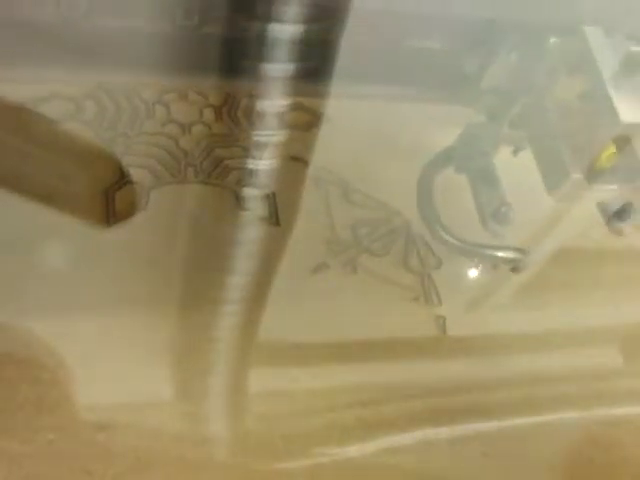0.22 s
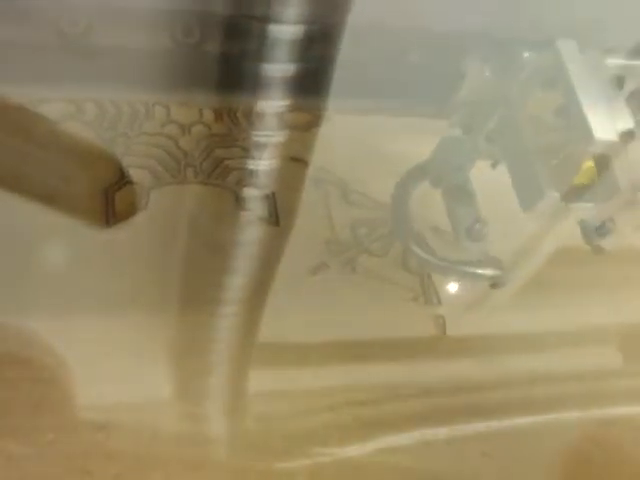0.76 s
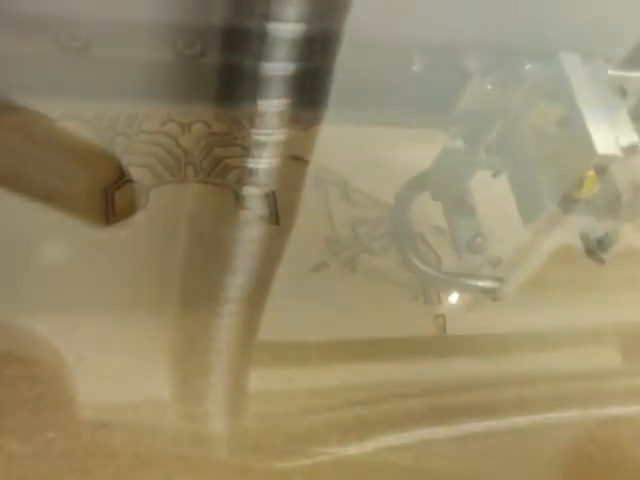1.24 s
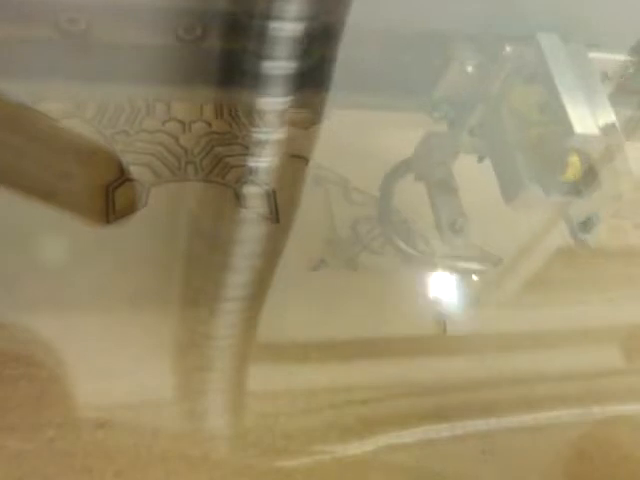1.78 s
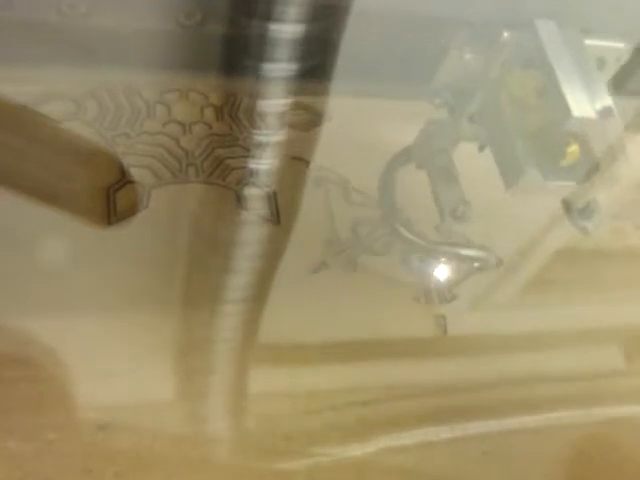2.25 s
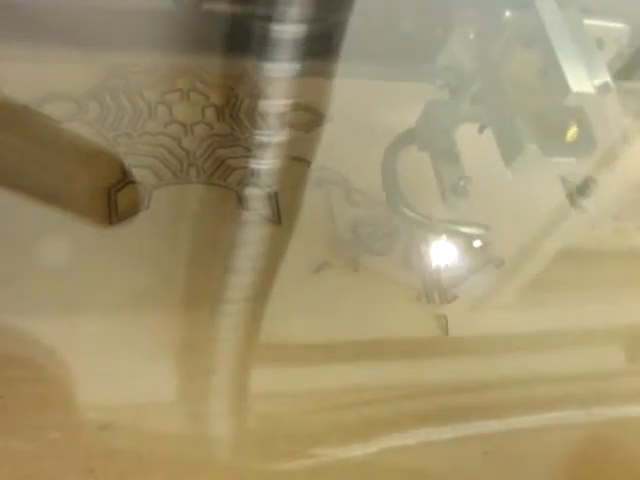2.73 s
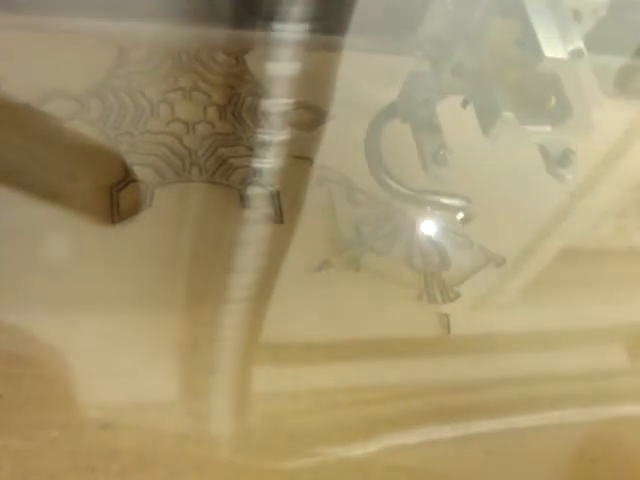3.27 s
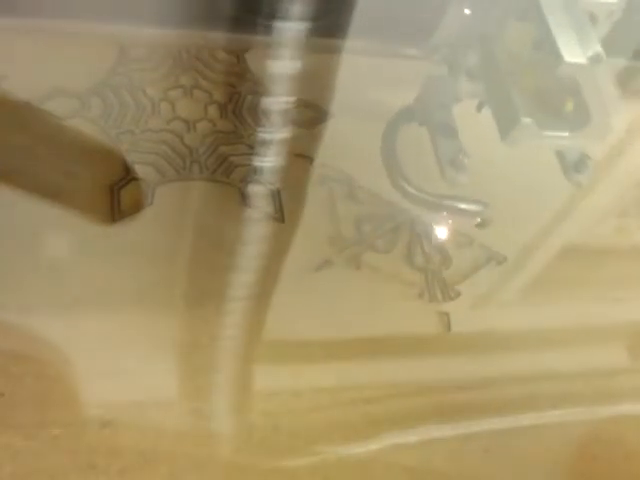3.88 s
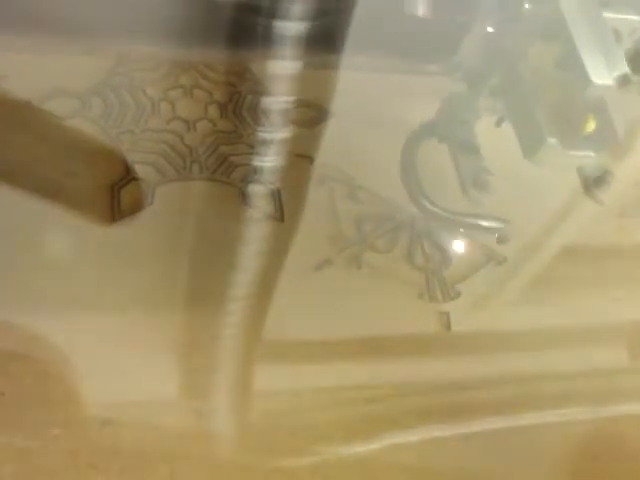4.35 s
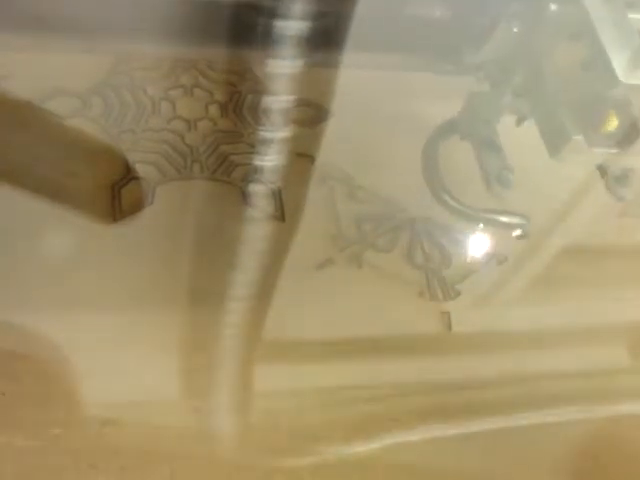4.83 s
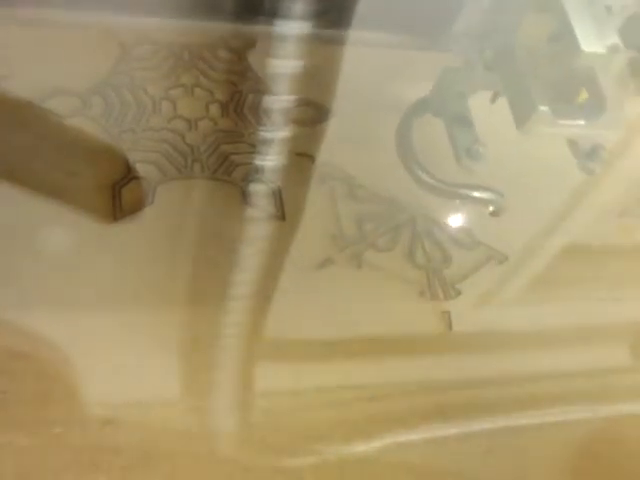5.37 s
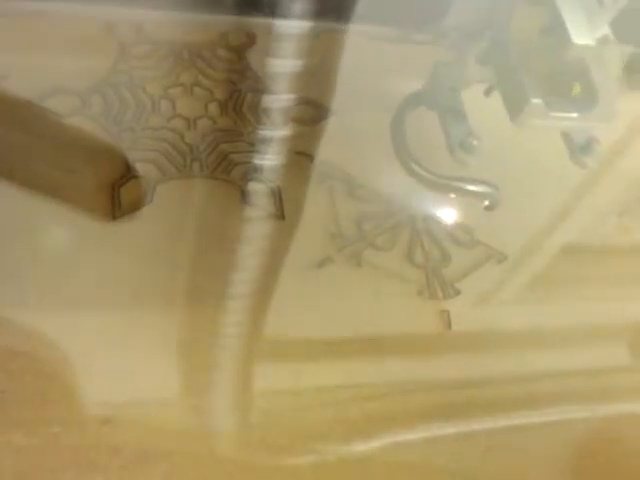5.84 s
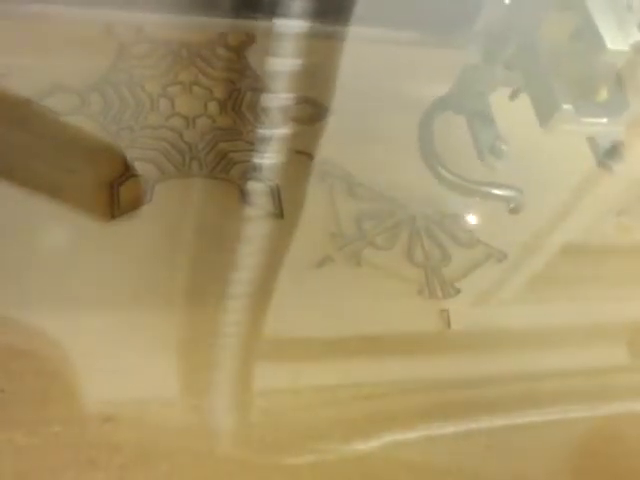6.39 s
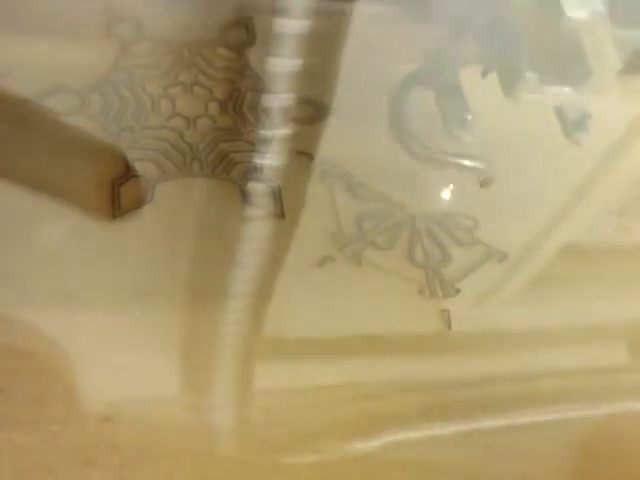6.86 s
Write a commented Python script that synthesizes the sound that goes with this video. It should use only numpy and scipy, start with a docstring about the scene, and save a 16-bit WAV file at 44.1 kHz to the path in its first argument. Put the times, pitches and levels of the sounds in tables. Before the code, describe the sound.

A laser cutter runs indoors for about seven seconds, heard from one microphone close by the lid. The main sound is a nearly even rush of exhaust air, with little top treble, present from start to end. Inside it a low duct drone flutters, dipping slightly around 1.7 and 5.2 seconds and swelling near 2.8. The motors steering the cutting head sing short, soft notes at changing low and middle pitches, some just blips, others held for up to a second, gliding a little and sometimes overlapping. The clearest note comes from about 1.7 to 2.2 seconds, and the motors pause briefly between 3 and 3.5 before carrying on. Behind them two fans whine steadily, over a faint, slightly wavering hum of pumps and panels. A single faint, dry tick sounds at about 1.8 seconds. The machine is still running at the end.

```python
"""Indoors, one microphone close by the lid of a working laser cutter.
Exhaust air rushes through the cabinet and its duct. Stepper motors sing short, soft notes as
they steer the head along the pattern. Behind them two fans whine on their blade tones over
a faint hum of pumps and panels. A single dry tick sounds early on."""
import sys
import numpy as np
from scipy.fft import rfft, irfft, next_fast_len
from scipy.io import wavfile
from scipy.ndimage import uniform_filter1d, map_coordinates

SR = 44100
rng = np.random.default_rng(int(sys.argv[2]) if len(sys.argv) > 2 else 0)


def digitize_waveform(pressure):
    """Quantize a signal to 16-bit integers and store it at the path in sys.argv[1].

    Rows of a 2-D input are taken as channels; values are limited to [-1, 1].
    """
    field = np.atleast_2d(pressure).T
    bounded = np.clip(field, -1, 1)
    quanta = np.round(bounded * 32767).astype(np.int16)
    wavfile.write(sys.argv[1], SR, quanta)


N = 313727

# Spectrum of the turbulent exhaust air. Each row: frequency in Hz, relative level in dB.
AIR_SPECTRUM = [(12, -45), (35, -29.5), (70, -22.5), (115, -10.5), (175, -12.5), (260, -2), (480, -4.5),
                (900, -2), (1500, -1.5), (2600, -1.7), (4150, -3), (4650, -13), (5400, -23.5), (7200, -37)]
# Resonances and nulls of cabinet, duct and nozzle. Each row: centre in Hz, width in Hz, lift in dB.
CAVITY_RESONANCES = [(47, 12, 9.5), (176, 14, -2), (200, 11, 4), (244, 11, -6.5), (362, 8, -3),
                     (505, 25, -2), (660, 100, 4.5), (715, 12, -3), (762, 52, 7.5), (817, 44, 8),
                     (878, 26, 5), (934, 34, 5), (1036, 40, 2.8), (1265, 90, 2.3), (1365, 40, 1.2),
                     (1750, 45, 2), (1865, 45, 2.5), (2927, 190, 2.5), (3115, 85, 4.3), (3200, 80, 5.3),
                     (3308, 30, 4), (3358, 55, 3.2), (3445, 55, 2), (4900, 190, 2.5), (6070, 240, -6.5),
                     (6630, 780, 6), (6960, 100, -3.5), (7120, 130, 3)]
# Chance rises and dips in the loudness of a low, fluttering noise band near 300 Hz.
# Each row: time in seconds, rms level in dB.
LOW_BAND_LEVELS = [(0, -33), (1.4, -34.5), (1.7, -39), (2.45, -35), (2.75, -30.5), (3.2, -34.5),
                   (4.85, -32.5), (5.22, -38.5), (5.702, -33), (7.11, -33.5)]
# Moves of the cutting head. Each row: start in seconds, length in seconds,
# first and last step rate in Hz, rms level of the held note in dB.
HEAD_MOVES = [ (.03, 1.1, 686, 692, -34), (.12, 0.11, 755, 788, -33), (.2, 0.62, 343, 337, -43),
              (.86, .9, 637.5, 644, -36.5), (1.28, 0.083, 483, 465, -33), (1.33, 0.12, 800, 788, -36.5),
              (1.42, 0.56, 139.3, 140.2, -49.5), (1.6, 0.16, 219, 201, -39), (1.716, 0.48, 680, 684, -28.5),
              (2.1, 0.31, 676, 663, -35.5), (2.27, 0.29, 134.3, 143, -48.5), (2.53, 0.069, 483, 470, -36),
              (2.683, 0.32, 630.5, 641, -33.5), (3.5, 0.28, 755, 733, -49), (3.77, 0.15, 530, 531, -36),
              (3.88, .9, 531.6, 535, -35.5), (4.67, .17, 137.7, 129, -45.5), (4.96, 0.13, 528, 526, -37.5),
              (5.249, 0.22, 391, 380, -37), (5.519, .16, 369, 376, -36), (5.94, 0.22, 778, 764, -36),
              (6.05, 0.73, 196, 197, -48.5), (6.53, 0.1, 463, 480, -39), (6.75, .16, 590, 450, -36),
              (6.99, 0.14, 756, 780, -35), ]
# Blade tones of the two fans. Each row: multiple of the blade rate, rms level in dB.
BLOWER_TONES = [(1, -37.2), (2, -44.5), (3, -52), (4, -44.5), (5, -37.7)]
COOLING_FAN_TONES = [(1, -42), (2, -41.8), (3, -44), (4, -46.5)]
# Hum and whine of the pumps and panels. Each row: frequency in Hz, rms level in dB.
HUM_TONES = [(89, -64.5), (137, -59), (551, -38), (580, -47.5), (1089, -47.5), (1161, -42.5), (1633, -42),
             (2114, -47.5), (2206, -50), (3125, -46.5)]

RISE_SHARE, FADE_SHARE = 0.16, 0.36  # parts of a move over which its note rises and fades
SKIRT_HZ, SKIRT_DB = 16, -11  # width and relative level of the noise around each fan and hum tone
MIC_TOP_HZ, TICK_TOP_HZ = 7260, 15700


def amp(db):
    """Decibels to gain."""
    return 10 ** (np.asarray(db) / 20)


def unit_rms(x):
    """x at rms 1."""
    return x / np.sqrt(np.mean(x ** 2) + 1e-20)


def wobble(rate):
    """A smooth random curve, rate knots a second."""
    knots = rng.standard_normal(int(N * rate / SR) + 4)
    return map_coordinates(knots, [np.arange(N) * rate / SR])


def filtered(x, response):
    """x through a filter whose gain is response(hz)."""
    size = next_fast_len(N + SR // 2)
    hz = np.fft.rfftfreq(size, 1 / SR)
    return irfft(rfft(x, size) * response(hz), size)[..., :N]


def shaken_tone(hz):
    """A sine of rms 1 that follows a frequency curve; turbulence shakes its level and phase."""
    shake = amp(SKIRT_DB) * (wobble(SKIRT_HZ) + 1j * wobble(SKIRT_HZ)) / np.sqrt(2)
    carrier = np.exp(2j * np.pi * (np.cumsum(hz) / SR + rng.random()))
    return unit_rms(np.real((1 + shake) * carrier))


def exhaust_rush(level_db, surge_db):
    """Up front, a nearly even flow of turbulent air, coloured by the cavities it passes."""
    def colour(hz):
        air_hz, air_db = np.transpose(AIR_SPECTRUM)
        turbulence_db = np.interp(np.log(hz + 1), np.log(air_hz + 1), air_db)
        cavity_db = sum(db * 2 ** -((2 * (hz - centre) / width) ** 2)
                        for centre, width, db in CAVITY_RESONANCES)
        return amp(turbulence_db + cavity_db)

    rush = unit_rms(filtered(rng.standard_normal(N), colour))
    return amp(level_db + surge_db * wobble(3.3)) * rush


def duct_drone(centre_hz, width_hz):
    """The flow drives the duct's resonance: a low, fluttering noise band with chance rises and dips."""
    ring = filtered(rng.standard_normal(N), lambda hz: 1 / (1 + (2 * (hz - centre_hz) / width_hz) ** 2))
    running_rms = np.sqrt(np.abs(uniform_filter1d(ring ** 2, size=SR // 4)))
    even_ring = ring / running_rms  # only the quick flutter stays
    level_db = np.interp(np.arange(N) / SR, *np.transpose(LOW_BAND_LEVELS))
    return amp(level_db) * even_ring


def stepper_notes(flutter_db, jitter_hz):
    """Under the lid the motors sing at their step rate, which glides where the path curves."""
    t = np.arange(N) / SR
    notes = np.zeros(N)
    judder_hz = jitter_hz * wobble(35)  # the rotors shake against the belt
    for start, length, first_hz, last_hz, db in HEAD_MOVES:
        moving = (t >= start) & (t < start + length)
        progress = (t[moving] - start) / length
        envelope = np.clip(np.minimum(progress / RISE_SHARE, (1 - progress) / FADE_SHARE), 0, 1)
        step_hz = first_hz + (last_hz - first_hz) * progress + judder_hz[moving]
        phase = 2 * np.pi * np.cumsum(step_hz) / SR
        notes[moving] += amp(db) * envelope * np.sqrt(2) * np.sin(phase)
    return notes * amp(flutter_db * wobble(30))  # the belt loads the motor unevenly


def fan_whine(tones, blade_hz, drift_share, flutter_db):
    """Blade tones share one drifting speed; uneven inflow makes each flutter on its own."""
    drifting_hz = blade_hz * (1 + drift_share * wobble(3))
    return sum(amp(db + flutter_db * wobble(14)) * shaken_tone(multiple * drifting_hz)
               for multiple, db in tones)


def pump_hum(waver_hz, flutter_db):
    """In the background, pumps and panels hold steady tones that waver slightly."""
    return sum(amp(db + flutter_db * wobble(5.9)) * shaken_tone(hz + waver_hz * wobble(6))
               for hz, db in HUM_TONES)


def dry_tick(at_s, impulse_db):
    """One faint tick, a low-passed impulse brighter than everything else."""
    impulse = np.zeros(N)
    impulse[round(at_s * SR)] = amp(impulse_db)
    return filtered(impulse, lambda hz: 1 / (1 + (hz / TICK_TOP_HZ) ** 120))


def scene():
    """Air, duct, head motors, fans and hum from close by the lid, in mono."""
    rush = exhaust_rush(level_db=-22.0, surge_db=0.13)
    drone = duct_drone(centre_hz=304.0, width_hz=41.3)
    motors = stepper_notes(flutter_db=1.6, jitter_hz=3.3)
    blower = fan_whine(BLOWER_TONES, blade_hz=619.2, drift_share=0.0007, flutter_db=0.5)
    cooling_fan = fan_whine(COOLING_FAN_TONES, blade_hz=642.5, drift_share=0.001826, flutter_db=3.5)
    hum = pump_hum(waver_hz=1.46, flutter_db=0.7)
    return (rush + drone + motors + blower + cooling_fan + hum)[None]


def record(dry):
    """A narrow-band microphone cuts the machine's top treble; only the added tick reaches higher."""
    machine = filtered(dry, lambda hz: hz < MIC_TOP_HZ)
    return machine + dry_tick(at_s=1.768, impulse_db=-18.5)


dry = scene()
out = record(dry)
digitize_waveform(out)
```